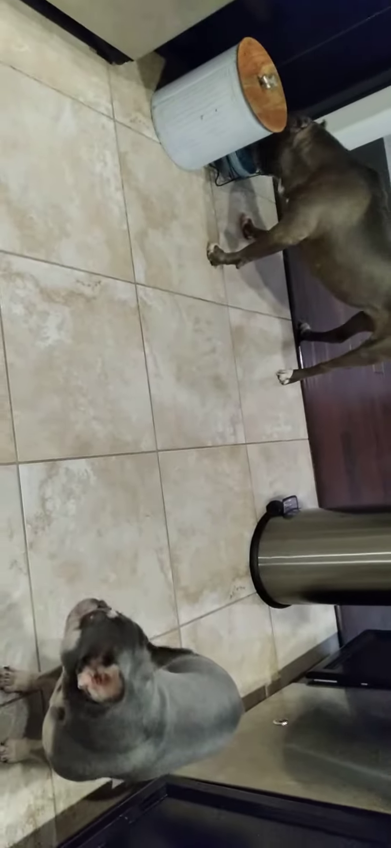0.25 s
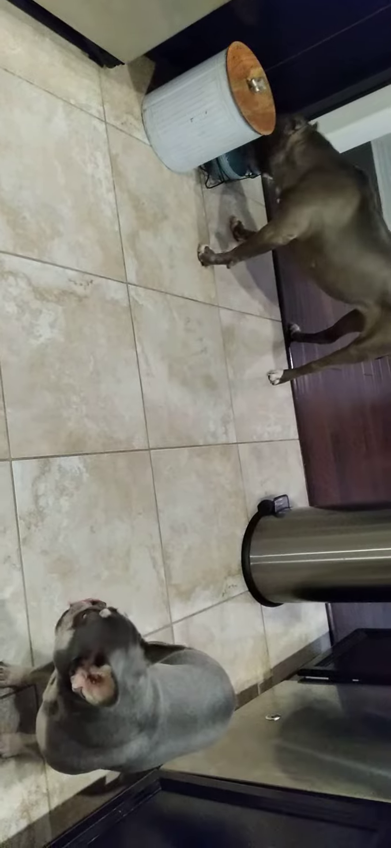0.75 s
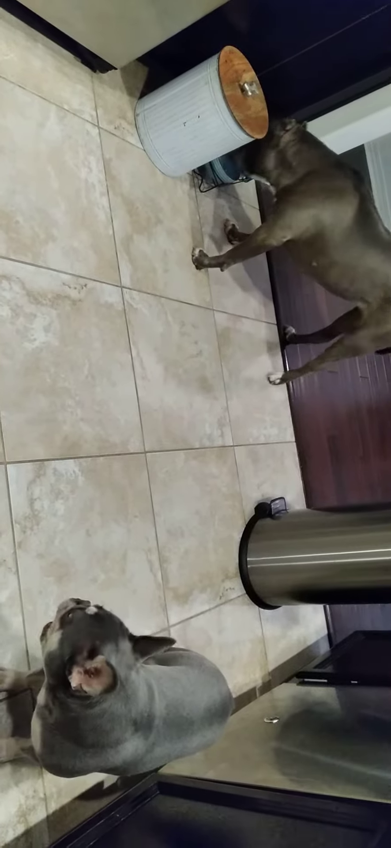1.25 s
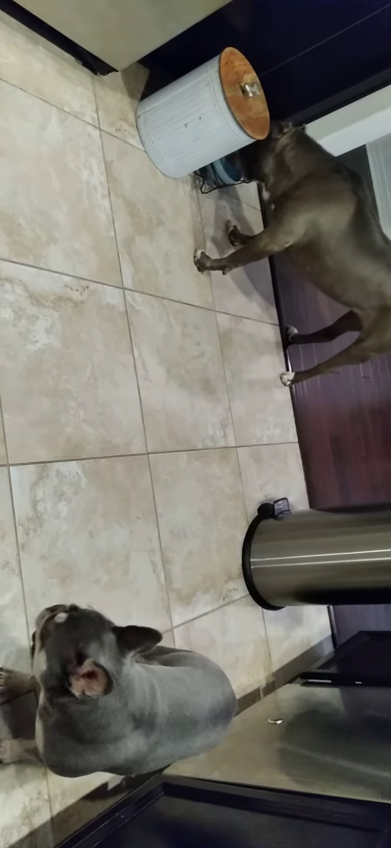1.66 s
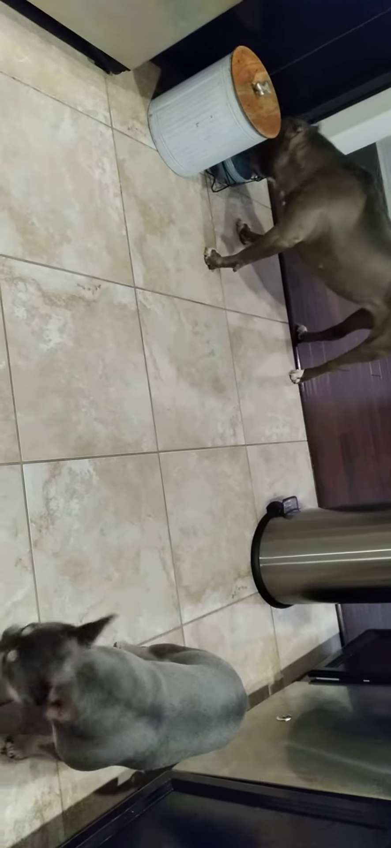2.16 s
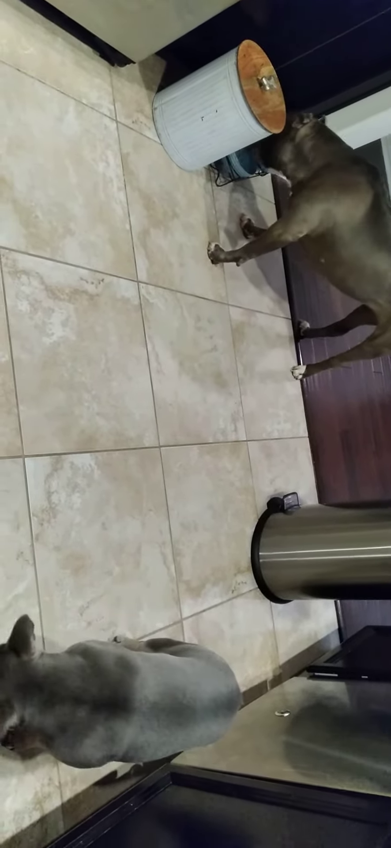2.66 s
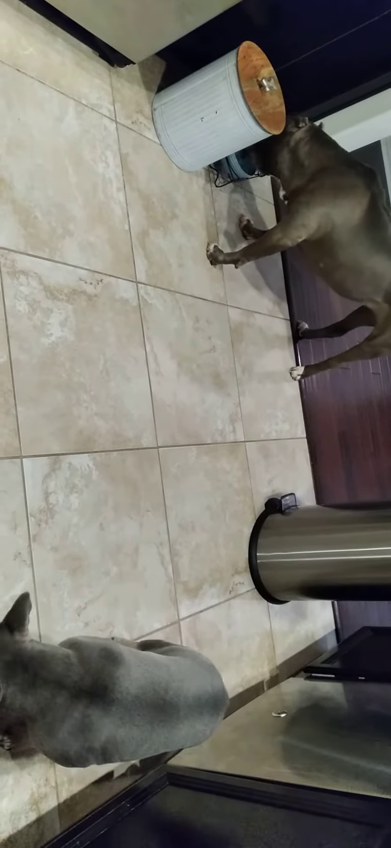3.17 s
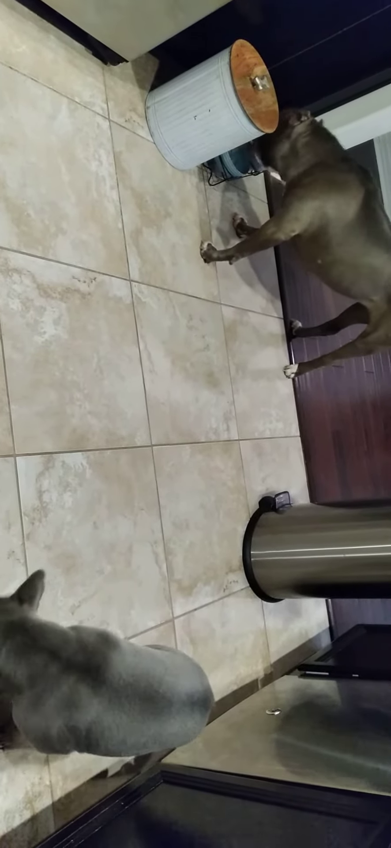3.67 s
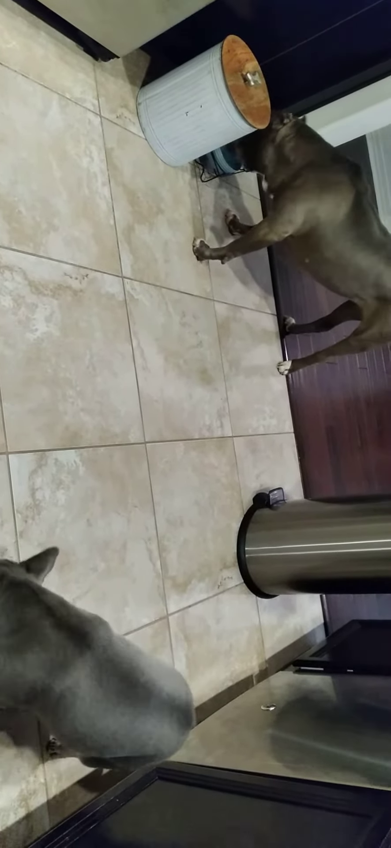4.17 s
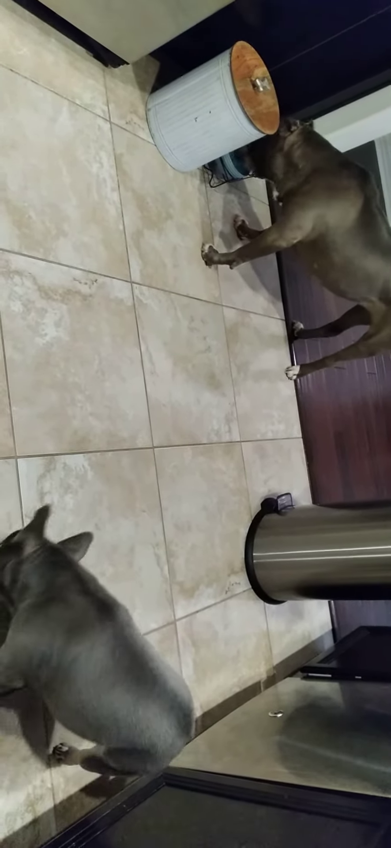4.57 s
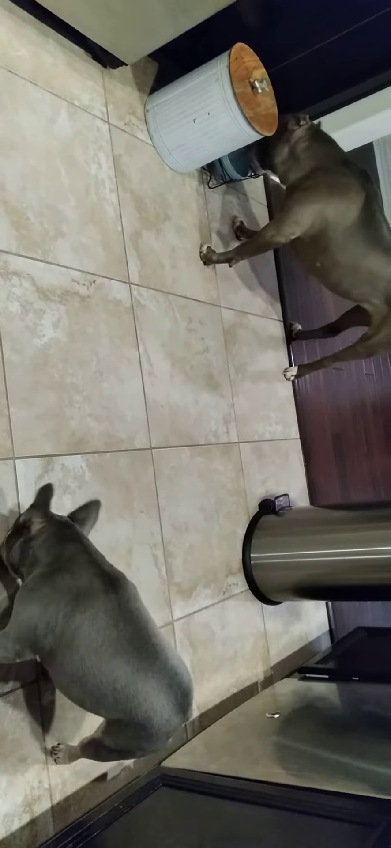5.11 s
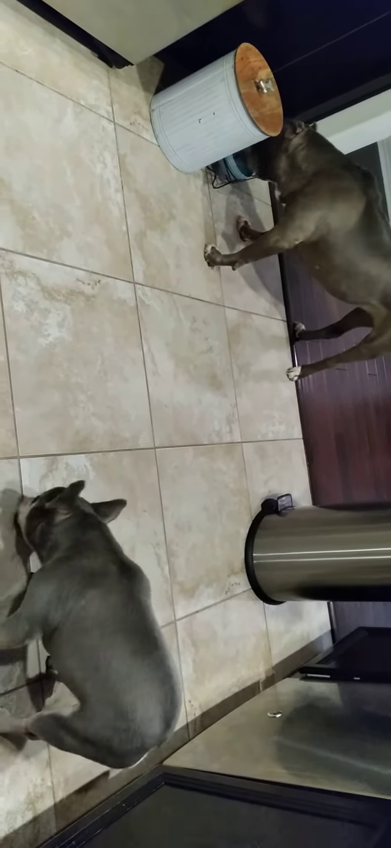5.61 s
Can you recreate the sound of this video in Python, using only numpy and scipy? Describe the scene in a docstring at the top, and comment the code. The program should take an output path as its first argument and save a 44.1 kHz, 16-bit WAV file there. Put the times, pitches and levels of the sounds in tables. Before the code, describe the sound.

Quick, even laps of a dog drinking, its tongue smacking the water as droplets tick and bubbles plop over a faint appliance hum.

```python
"""Over a faint appliance hum, a dog laps water in a tiled kitchen, nearly three laps a second.
In each lap the tongue smacks the water, an air pocket gulps under it, and it smacks again pulling out.
Drops tick and bubbles plop between laps; the stirred water gurgles once, and twice the lips slurp.
A stereo pair of microphones hears the dispenser's bowl ring and the hard walls answer briefly."""
import sys
import numpy as np
from scipy import signal
from scipy.fft import rfft, irfft
from scipy.io import wavfile

SR = 44100
rng = np.random.default_rng(int(sys.argv[2]) if len(sys.argv) > 2 else 0)


def dump(signal):
    """Clip the signal to [-1, 1] and save it as 16-bit WAV at the path in sys.argv[1]."""
    limited = np.clip(np.atleast_2d(signal).T, -1, 1)
    pcm = np.round(limited * 32767).astype(np.int16)
    wavfile.write(sys.argv[1], SR, pcm)


N = 257984
T = np.arange(round(.15 * SR)) / SR  # time axis of one short sound

# dips of the tongue: t/s, time under water/s, gulp/dB, pocket f/Hz, first ring/dB, low push/dB,
# entry smack/dB, exit smack/dB, spray/dB
LAPS = [(0.152, 0.056, -33, 716, -34, -56, -24, -20, -55),
        (0.501, 0.041, -31, 785, -34, -35, -19.5, -16.5, -36),
        (0.889, 0.04, -24.5, 834, -30, -33.5, -17, -27, -33),
        (1.234, 0.042, -37.5, 488, -39.5, -39, -24, -29, -44),
        (1.570, 0.046, -32, 631, -43, -41, -18, -25, -62),
        (1.908, 0.04, -30.5, 825, -21.5, -27.5, -21, -21, -40),
        (2.307, 0.043, -25.5, 743, -22.5, -42, -13, -23, -58),
        (2.639, 0.037, -27.5, 841, -27.5, -46, -15.5, -21, -48),
        (2.976, 0.035, -30.5, 617, -30.5, -31, -15.5, -16.5, -42),
        (3.384, 0.035, -28.5, 763, -27.5, -28, -15.5, -23.5, -51),
        (3.735, 0.035, -39.5, 590, -34.5, -35, -24.5, -17.5, -55),
        (4.071, 0.05, -39, 898, -33, -33, -16, -39, -46),
        (4.413, .050, -32, 611, -31, -56, -18.5, -19.5, -55),
        (4.801, .044, -29, 742, -32, -69, -18, -17.5, -28),
        (5.144, 0.043, -30, 636, -29, -57, -16, -21, -66),
        (5.482, 0.044, -29, 748, -32.5, -37.5, -13.5, -24, -49),
        (5.82, .042, -35, 550, -34, -38, -17, -21, -47)]
# spectra of wet clicks, fine spray and hollow splashes: f/Hz, relative level/dB
WET_SPECTRUM = [(2500, -38), (5000, -15.5), (7000, -4), (8200, -3), (9000, 3.5), (9900, -1.5),
                (11000, -11.5), (14000, -18.5)]
SPRAY_SPECTRUM = [(7000, -24), (10500, -1), (13000, 0), (15000, -4), (16200, -9)]
SPLASH_SPECTRUM = [(500, -54), (900, -12), (1350, -9), (2000, -2.5), (2900, -0.5), (3900, -7.5),
                   (5300, -4.5), (7000, -16), (12000, -56)]


def amp(db):
    """Decibels to gain."""
    return 10 ** (np.asarray(db) / 20)


def unit(x):
    """Scales to an energy of one."""
    return x / np.sqrt(np.sum(x ** 2) + 1e-30)


def read(points, hz):
    """Reads a table on a log-frequency axis."""
    f, value = np.transpose(points)
    return np.interp(np.log(hz + 1), np.log(f), value)


def add(mix, s, sound):
    """Mixes a sound in at time s."""
    part = mix[max(round(s * SR), 0):][:len(sound)]
    part += sound[:len(part)]


def colour(x, points, size=2048):
    """Causal filter with the given spectrum."""
    log_gain = np.log(amp(read(points, abs(np.fft.fftfreq(size, 1 / SR)))))
    taps = np.fft.ifft(np.exp(np.conj(signal.hilbert(log_gain)))).real
    return signal.fftconvolve(x, taps)[:len(x)]


def resonate(x, hz, width_hz):
    """A resonance of gain one that follows the curve hz."""
    turn = np.exp(2j * np.pi * np.cumsum(hz) / SR)
    pole = np.exp(-np.pi * width_hz / SR)
    return 2 * (turn * signal.lfilter([1 - pole], [1, -pole], x / turn)).real


def room_tone(air_db=-77):
    """Quiet room air and the wavering hum of an appliance; the bass is alike at both microphones."""
    air_spectrum = [(15, -32), (25, -21), (70, -10.5), (195, -3.5), (503, -14), (1070, -16), (1440, -23.5),
                    (3250, -27.5), (3920, -23), (5280, -25), (6740, -24.5), (9070, -17.5), (16000, -32)]  # room air: f/Hz, relative level/dB
    air_likeness = [(100, 0.8), (400, 0.62), (1500, 0.3)]  # air common to both sides: f/Hz, share of power
    hum_partials = [(57, -93), (76.5, -87), (153, -99), (231, -96)]  # appliance tones: f/Hz, level/dB
    hz, t = np.fft.rfftfreq(N, 1 / SR), np.arange(N) / SR
    own, shared = rfft(rng.standard_normal((2, N))), rfft(rng.standard_normal(N))
    same = np.clip(read(air_likeness, hz), 0, 1)
    air = irfft((np.sqrt(same) * shared + np.sqrt(1 - same) * own) * amp(read(air_spectrum, hz)), N)
    drifts = np.cumsum(rng.standard_normal((len(hum_partials), N)), axis=1) / np.sqrt(SR)
    hum = sum(amp(db) * np.sqrt(2) * np.sin(2 * np.pi * (f * t + .5 * drift))
              for (f, db), drift in zip(hum_partials, drifts))
    return amp(air_db) * np.sqrt(2 * N) * unit(air) + hum


def crackle(count, per_s, spread_db):
    """Tiny films bursting: random clicks, uneven in size unless spread_db is zero."""
    size = amp(spread_db * np.minimum(rng.exponential(1, count), 3))
    return size * rng.choice([-1, 1], count) * (rng.random(count) < per_s / SR)


def smack(s, db, hollow_db, spray_db, life):
    """A wet surface peels away: a few clicks lead in, then a quick shower and some froth ring hollow."""
    lead_s = .018
    after = T - lead_s
    shift, hollow_hz = 1 + .025 * rng.uniform(-1, 1), rng.uniform(2454, 6350)
    swell = np.exp(np.minimum(after, 0) / .0016) + .26 * np.minimum(T / lead_s, 1)
    shower = crackle(len(T), per_s=3000, spread_db=5.5) * swell * np.exp(-np.maximum(after, 0) / life)
    ring = unit(colour(shower, [(f * shift, level) for f, level in WET_SPECTRUM]))
    body_spectrum = [(500, -4.5), (1200, 5.5), (2000, 3), (3000, 6), (3900, -1), (5300, 10.5), (6500, 11.5),
                     (9000, -2.5)]  # hollow body of a smack: f/Hz, relative level/dB
    body = colour(shower, body_spectrum)
    hollow = unit(body) + amp(-6.5) * unit(resonate(body, np.full(len(T), hollow_hz), width_hz=600))
    spray = amp(spray_db) * unit(colour(shower, SPRAY_SPECTRUM))
    yield s - lead_s, amp(db) * (ring + amp(hollow_db) * unit(hollow)) + spray
    yield s, amp(db + hollow_db - 4) * froth(life, hollow_hz)


def froth(life, hz, count=7):
    """A handful of tiny bubbles, in the octave around hz, burst within a few decay times."""
    out, short = np.zeros(len(T)), T[:len(T) // 8]
    for when, pitch, faintness in rng.random((count, 3)):
        cycles = hz * 2 ** (pitch - .5) * short
        note = np.sin(2 * np.pi * cycles * (1 + 12 * short)) * np.exp(-cycles / 5)
        add(out, 3.8 * life * when ** 2, amp(-10 * faintness - 13 * when) * unit(note))
    return unit(out)


def smacks():
    """The tongue smacks going in and coming out; between laps, plopping bubbles or parting lips smack."""
    for s, under_s, *_, entry_db, exit_db, spray_db in LAPS:
        yield from smack(s, entry_db, hollow_db=-9.5, spray_db=spray_db, life=.0083)
        exit_spray_db = spray_db + exit_db - entry_db
        yield from smack(s + under_s, exit_db, hollow_db=-8, spray_db=exit_spray_db, life=.012)
    # wet smacks between laps: t/s, level/dB, hollow body relative to it/dB
    stray_smacks = [(0.490, -24, -5.5), (0.796, -35.5, -18), (1.165, -30.5, -45), (1.673, -26, -8),
                    (1.896, -24, 0.5), (2.769, -22, -14), (3.565, -37.5, -11), (3.971, -33.5, -26),
                    (4.263, -24.5, -10), (4.397, -24, -10), (4.567, -16.5, -6.5)]
    for s, db, hollow_db in stray_smacks:
        yield from smack(s, db, hollow_db, spray_db=db - 25, life=.016)


def bubble(hz, life, glide, rise):
    """An air pocket rings and dies; its pitch slides as it changes size. life and rise are in seconds."""
    pitch = hz * np.exp(glide * (1 - np.exp(-T / life) - .5))
    return unit(np.sin(2 * np.pi * np.cumsum(pitch) / SR) * np.exp(-T / life) * (1 - np.exp(-T / rise)))


def gulps():
    """A small pocket rings, then the tongue opens a deeper one that gulps, churns and pushes water."""
    push_spectrum = [(60, -33), (120, -14), (170, -3), (300, -4), (460, 1), (800, -7), (2000, -48)]  # pushed water: f/Hz, relative level/dB
    for s, _, db, hz, first_db, push_db, *_ in LAPS:
        yield s - .005844, amp(first_db) * bubble(1092.5, life=.0019, glide=-.025, rise=.0013)
        yield s + .00175, amp(db) * bubble(hz, life=.00865, glide=-.4, rise=.0018)
        clicks = crackle(len(T), per_s=2800, spread_db=0) * np.exp(-T / .009) * (1 - np.exp(-T / .0019))
        pitch = hz * (.8 + .21 * np.exp(-T / .017))  # falls as the pocket grows
        churn = resonate(resonate(clicks, pitch, width_hz=370), pitch, width_hz=290)
        yield s + .00089, amp(db + 3) * unit(churn)
        push = crackle(len(T), per_s=1800, spread_db=-4.5) * np.exp(-T / .0053)
        push *= 1 - np.exp(-T / .0017)
        yield s + .0014, amp(push_db) * unit(colour(push, push_spectrum))


def ticks():
    """Drops and films snap sharply; the tongue also snaps a film each time it meets the water."""
    drops = [(0.485, -19.5, -54), (0.625, -22.5, -35), (1.4202, -15, -51), (1.6586, -11, -24),
             (1.8029, -36, -50), (2.2512, -33.5, -42), (2.4228, -30, -34.5), (3.285, -37.5, -71),
             (4.0517, -14.5, -38), (4.116, -14.5, -23), (4.459, -17.5, -48), (4.5655, -13, -48),
             (4.7, -26, -63), (4.847, -33, -14), (5.288, -30.5, -50)]  # single drops and films: t/s, level/dB, spray/dB
    tongue = [(s + .0015, entry_db - 3, spray_db - 3) for s, *_, entry_db, _, spray_db in LAPS]
    for s, db, spray_db in drops + tongue:
        snap = rng.standard_normal(len(T)) * np.exp(-T / .002) * (1 - np.exp(-T / .0005))
        spray = amp(spray_db) * unit(colour(snap, SPRAY_SPECTRUM))
        yield s, amp(db) * unit(colour(snap, WET_SPECTRUM)) + spray


def droplet_snap(life):
    """A droplet lands: a wet burst of noise with a decay time of life seconds."""
    return unit(colour(rng.standard_normal(len(T)) * np.exp(-T / life), WET_SPECTRUM))


def spatter(count=6):
    """After each lap a few droplets fall back into the bowl, each with a small snap and its own note."""
    for s, _, gulp_db, *_, entry_db, _, _ in LAPS:
        for when, faintness, pitch in rng.random((count, 3)):
            hz = 1300 * 4.5 ** pitch
            note = amp(gulp_db + 1) * bubble(hz, life=6 / hz, glide=.074, rise=.00024)
            snap = amp(entry_db - 16) * droplet_snap(life=.00069)
            yield s + .029 + .078 * when, amp(-14 * when - 25 * faintness) * (note + snap)


def dribble(count=30, loudest_db=-40.5, range_db=23.5):
    """Faint stray droplets fall from the muzzle all the time."""
    for when, faintness, pitch in rng.random((count, 3)):
        snap = droplet_snap(life=.0039)
        note = bubble(800 * 3.5 ** pitch, life=.0019, glide=.2, rise=.00079)
        yield when * N / SR, amp(loudest_db - range_db * faintness) * (snap + amp(-11.5) * note)


def plops():
    """A small air pocket shudders in a few quick pulses as it surfaces and leaves a hollow splash."""
    pockets = [(0.3102, -40, 1120, -51), (0.433, -51.5, 1765, -78), (1.058, -29, 3050, -40),
               (1.065, -36.5, 650, -69), (1.286, -38, 1830, -64), (1.398, -40, 880, -43),
               (1.617, -39, 2680, -57), (2.4623, -36, 2940, -50), (2.7746, -18.5, 1250, -19.5),
               (3.5544, -41, 815, -37.5), (3.899, -43, 805, -56), (4.2113, -19, 1360, -24),
               (4.5658, -24, 1200, -38), (4.8475, -26, 3130, -24), (4.9399, -24, 1490, -25),
               (5.2724, -38, 1030, -65), (5.6247, -31, 1330, -41)]  # surfacing bubbles: t/s, level/dB, f/Hz, splash/dB
    for s, db, hz, splash_db in pockets:
        shudder = crackle(len(T), per_s=2700, spread_db=1.5) * np.exp(-T / .004)
        splash = crackle(len(T), per_s=6100, spread_db=-4) * np.exp(-T / .0046)
        pitch = hz * (1.04 - .05 * np.exp(-T / .023))  # rises towards the surface
        note = resonate(resonate(shudder, pitch, width_hz=.33 * hz), pitch, width_hz=.33 * hz)
        yield s - .001, amp(db) * unit(note) + amp(splash_db) * unit(colour(splash, SPLASH_SPECTRUM))


def slosh(start_s=1.26, end_s=1.9, count=50):
    """Stirred water gurgles with pockets of many sizes, mostly low, under crackling foam; both fade."""
    gurgle_db, gurgle_db_per_s = -44, -21
    foam_db, foam_db_per_s = -14.5, -41.5
    length = end_s - start_s
    for at, (pitch, delay) in zip(np.linspace(0, length, count), rng.random((count, 2))):
        hz = 190 * 13 ** (pitch ** 1.51)
        pocket = bubble(hz, life=1.7 / hz, glide=.067, rise=.00043)
        yield start_s + at + .0091 * delay, amp(gurgle_db + gurgle_db_per_s * at) * pocket
    t = np.arange(SR) / SR
    foam = crackle(len(t), per_s=640, spread_db=6.5) * amp(foam_db_per_s * t) * (t < length)
    yield start_s, amp(foam_db) * unit(colour(foam, WET_SPECTRUM))


def slurps():
    """Water drawn through the lips fizzes in dense small clicks, with a fuzzy whistle that sinks."""
    slurp_curves = [
        [(3.6, -74, -89, 11200), (3.7, -59.5, -75, 10800), (3.74, -48.5, -76.5, 10400),
         (3.785, -52, -65, 10000), (3.858, -50, -82, 10130), (3.9, -66, -64.5, 10300), (3.95, -96, -100, 9900)],
        [(5.55, -58, -80, 10400), (5.59, -56.5, -103, 10300), (5.646, -68.5, -74.5, 10000),
         (5.764, -69, -84.5, 9500), (5.8, -85, -76, 9800)],
    ]  # one table a slurp: t/s, fizz/dB, splash/dB, whistle f/Hz
    fizz_spectrum = [(3000, -37), (6500, -0.5), (8500, 6.5), (10400, 9), (11500, 3), (15500, 2.5)]  # fizz at the lips: f/Hz, relative level/dB
    for rows in slurp_curves:
        s, fizz_db, splash_db, whistle_hz = np.transpose(rows)
        t = np.arange(s[0], s[-1], 1 / SR)
        clicks = crackle(len(t), per_s=2600, spread_db=7)
        pitch = np.interp(t, s, whistle_hz)
        whistle = unit(resonate(resonate(clicks, pitch, width_hz=800), pitch, width_hz=800))
        fizz = amp(np.interp(t, s, fizz_db)) * (unit(colour(clicks, fizz_spectrum)) + .5 * whistle)
        splash = amp(np.interp(t, s, splash_db)) * unit(colour(clicks, SPLASH_SPECTRUM))
        yield s[0] - .008, (fizz + splash) * np.sqrt(len(t)) * signal.windows.tukey(len(t), .1)


def kitchen(sound, room_db):
    """From one spot at the bowl to both microphones: direct sound, echoes, ringing corner, tail."""
    corner_modes = [(610, -2.5, 0.31), (644.5, -4, 0.3), (683, -18.5, 0.59), (807, -19, 0.48),
                    (923, 1, 0.35), (1088, 1, 0.26), (1230, 3.5, 0.094), (1320, 0.5, 0.33),
                    (1375, -10.5, 0.58), (1470, -16, 0.51), (1938, 6.5, 0.16)]  # ring of the bowl and its corner: f/Hz, relative level/dB, t60/s
    tail_decay = [(150, 0.2), (500, 0.26), (900, 0.31), (1400, 0.33), (3500, 0.36), (9000, 0.29),
                  (15000, 0.15)]  # reverberation of the tiled room: f/Hz, t60/s
    tail_likeness = [(200, 0.99), (330, 0.91), (550, 0.72), (1000, 0.014)]  # tail common to both sides: f/Hz, share of power
    echoes = [(.0031, -12), (.0064, -12.5), (0.012, -5), (.021, -15.5)]  # cabinet, floor, ceiling, wall: t/s, level relative to the tail/dB
    left_excess = [(200, 3.5), (600, 0), (1100, 3.5), (2000, 2), (4000, 1.5), (9000, 2.5)]  # left microphone over the right: f/Hz, level/dB
    t = np.arange(round(.4 * SR)) / SR
    hz, at, (shared, *own) = signal.stft(rng.standard_normal((3, len(t))), SR, nperseg=512)
    same = np.clip(read(tail_likeness, hz), 0, 1)[:, None]
    decay = amp(-60 * at / read(tail_decay, hz)[:, None])
    pair = []
    for noise, lag_s, side in zip(own, [.00036, 0], [.5, -.5]):
        diffuse = np.sqrt(same) * shared + np.sqrt(1 - same) * noise
        tail = signal.istft(diffuse * decay, SR, nperseg=512)[1][:len(t)]
        ring = sum(amp(db - 60 * t / t60) * np.sin(2 * np.pi * (f * t + rng.random()))
                   for f, db, t60 in corner_modes)
        response = unit(tail * (1 - np.exp(-t / .00053))) + amp(-13.5) * unit(ring)
        for s, db in echoes:
            add(response, s + rng.uniform(-.00033, .00049), amp([db]))
        response *= amp(room_db)
        add(response, lag_s, np.ones(1))  # the direct sound reaches the right microphone first
        pair.append(colour(response, [(f, side * db) for f, db in left_excess]))
    return signal.oaconvolve(sound[None], np.array(pair), axes=1)[:, :N]


def scene(spot_count=6):
    """Laps come from changing spots, half hidden in the bowl; ticks snap in the open and sound drier."""
    spots, open_air = np.zeros((spot_count, N)), np.zeros(N)
    for source in (gulps, smacks, spatter, plops, slurps, slosh, dribble):
        for s, sound in source():
            add(spots[rng.integers(spot_count)], s, sound)
    for s, sound in ticks():
        add(open_air, s, sound)
    water = sum(kitchen(spot, room_db=4) for spot in spots) + kitchen(open_air, room_db=-4.5)
    low_cut = signal.butter(3, 95, "high", fs=SR, output="sos")  # the water sounds carry no deep bass
    return signal.sosfilt(low_cut, water) + room_tone()


def record(dry, edge_hz=15950):
    """The band limit of the recorder."""
    return signal.oaconvolve(dry, signal.firwin(511, edge_hz, window=("kaiser", 9), fs=SR)[None], "same")


dry = scene()
out = record(dry)
dump(out)
```